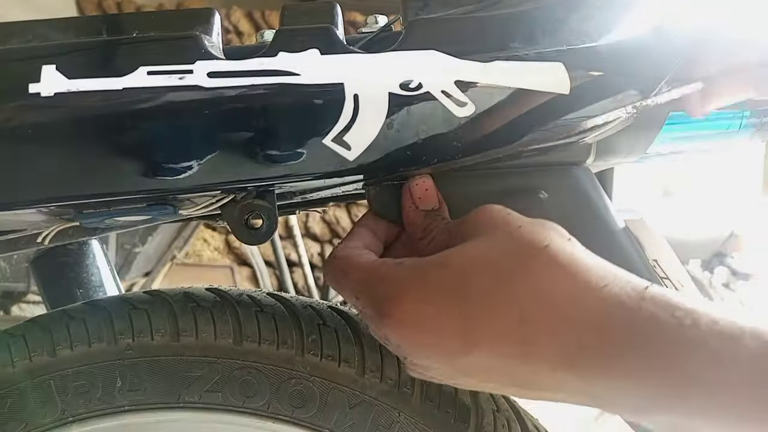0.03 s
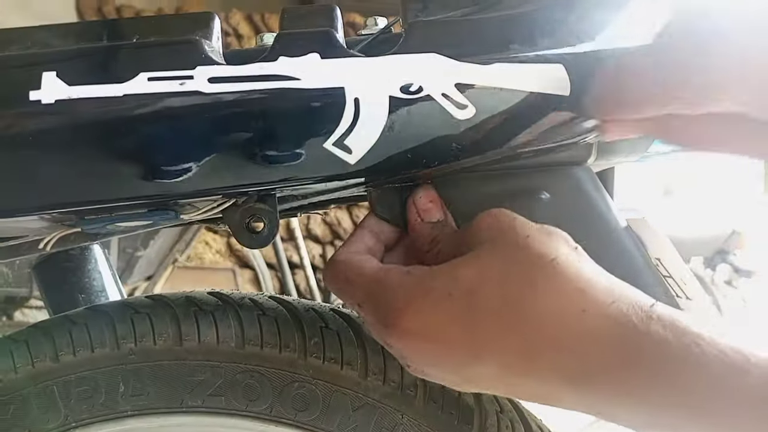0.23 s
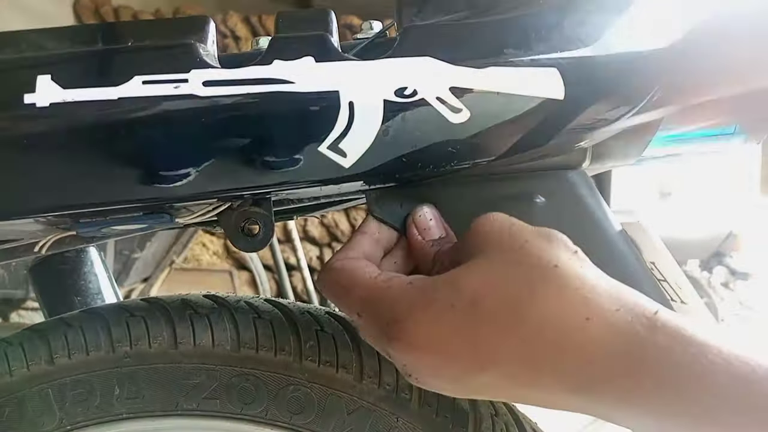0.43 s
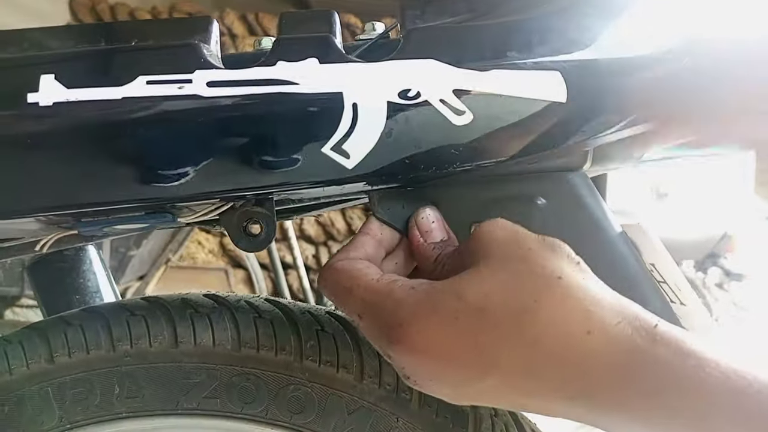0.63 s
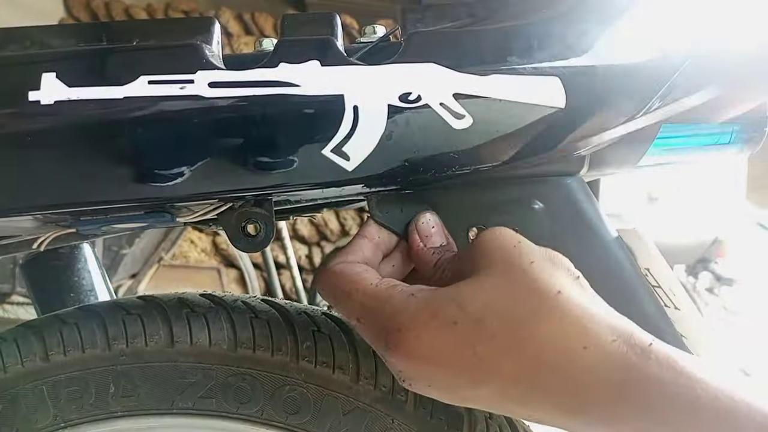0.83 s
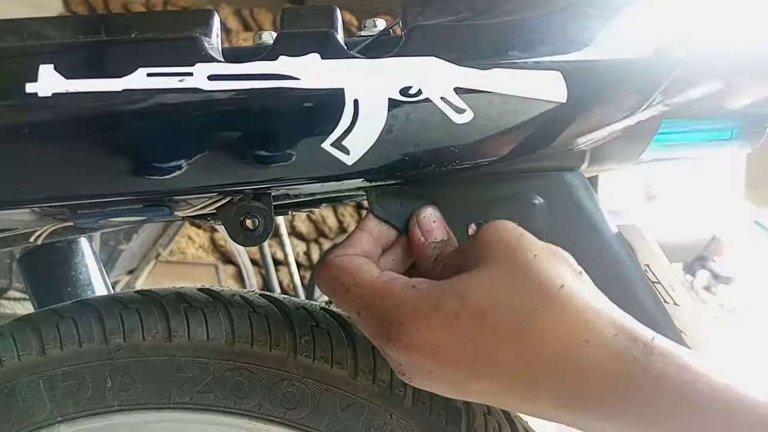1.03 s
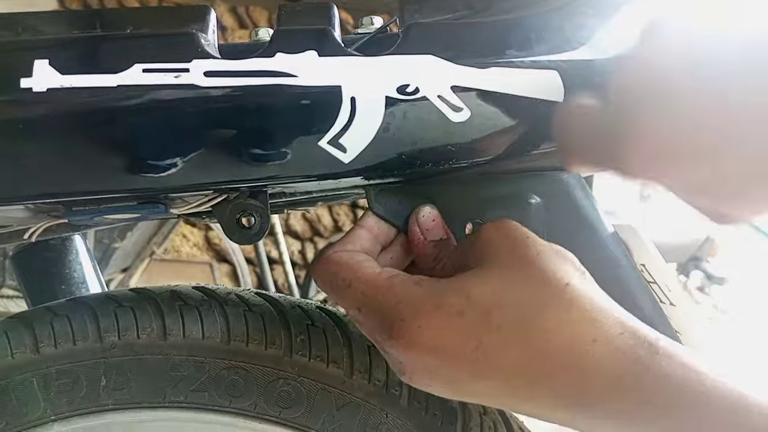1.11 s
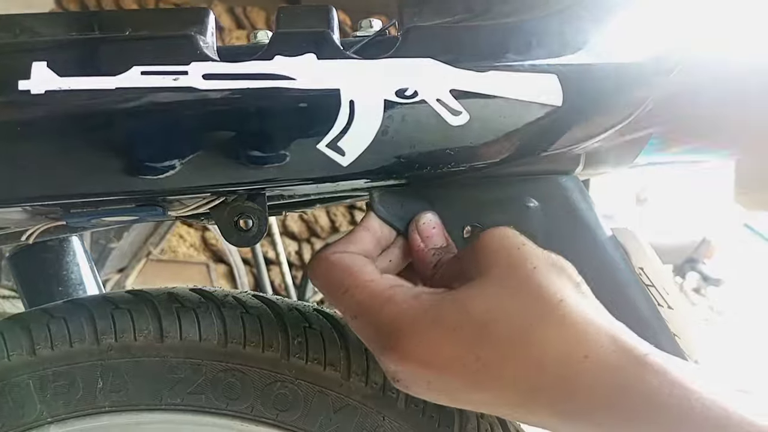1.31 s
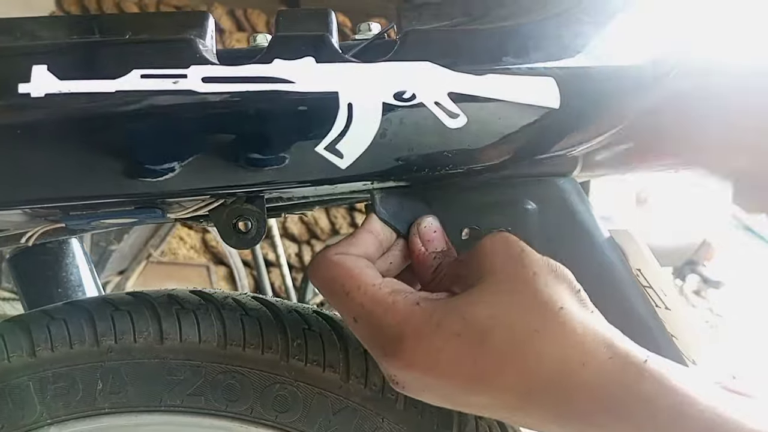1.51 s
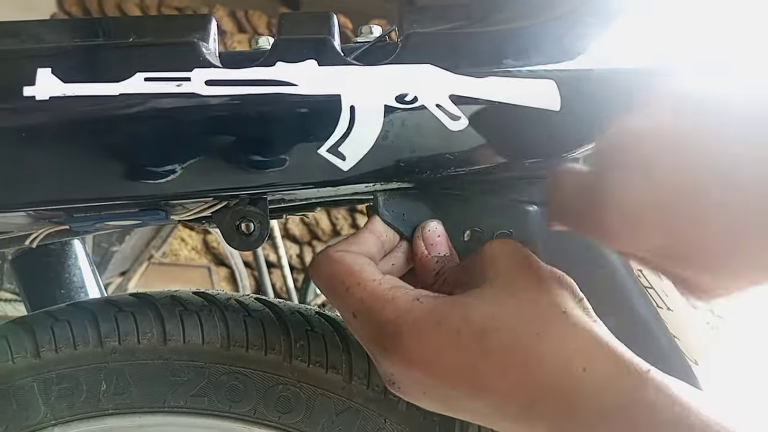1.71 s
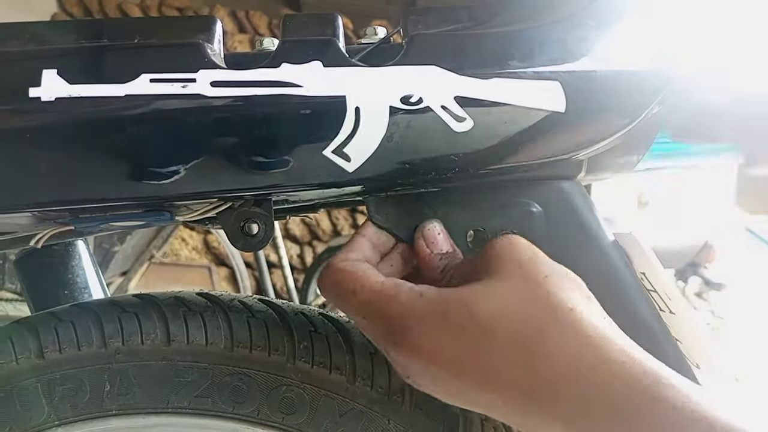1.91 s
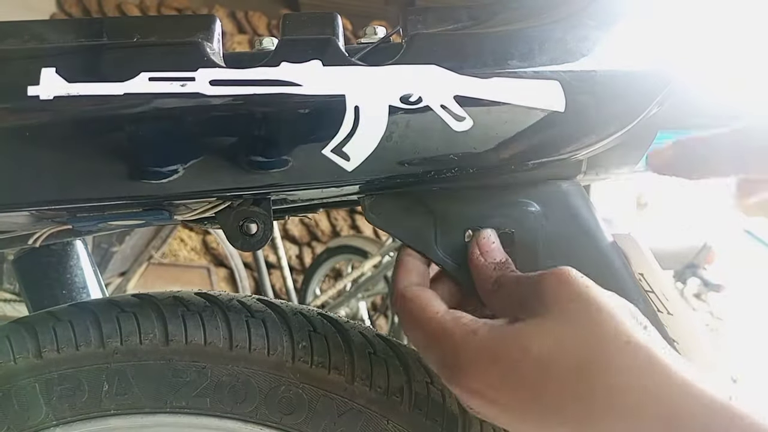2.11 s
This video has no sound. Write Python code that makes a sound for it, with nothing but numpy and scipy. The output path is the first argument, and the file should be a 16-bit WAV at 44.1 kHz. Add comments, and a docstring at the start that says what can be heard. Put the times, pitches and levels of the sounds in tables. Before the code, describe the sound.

Fast hacksaw strokes rasp through a hand-held plastic mudguard, with groans and one sharp snap.

```python
"""A faint rising squeak over a quiet yard, then a light, bright scrape as a hacksaw blade slides in.
Close by, it cuts a hand-held plastic mudguard in about twelve strokes a second: each pass speeds up
and slows as the teeth pluck the panel, tear off chips and hiss in the slot. Coarse bites, groaning
judders and edge knocks colour the strokes; one sharp snap breaks out, and a last light slide draws
the blade out. Shaped noise, tooth pulses and resonant modes make the sound, alike in both ears."""
import sys
import numpy as np
from scipy import signal
from scipy.fft import rfft, irfft, next_fast_len
from scipy.io import wavfile
from scipy.ndimage import map_coordinates

SR = 44100
rng = np.random.default_rng(int(sys.argv[2]) if len(sys.argv) > 2 else 0)


def put_to_file(sound):
    """Save the sound as 16-bit audio at rate SR, in the file named by the first command-line argument."""
    columns = np.atleast_2d(sound).T  # one column per channel
    safe = np.clip(columns, -1, 1)
    whole_steps = np.round(safe * 32767)
    wavfile.write(sys.argv[1], SR, whole_steps.astype(np.int16))


N = 94815  # samples


def amp(db):
    """Decibels to gain."""
    return 10 ** (np.asarray(db) / 20)


def unit(x):
    """Scale to rms 1."""
    return x / np.sqrt(np.mean(x ** 2) + 1e-20)


def filtered(x, response):
    """Multiply the spectrum of x by a complex response of frequency."""
    size = next_fast_len(N + SR // 2)
    spectrum = rfft(x, size) * response(np.fft.rfftfreq(size, 1 / SR))
    return irfft(spectrum, size)[:N]


def colour(x, points, size=4096):
    """Minimum-phase filter of energy 1, shaped by (frequency [Hz], level [dB]) points."""
    hz, db = np.transpose(points)
    log_grid = np.log(np.fft.rfftfreq(size, 1 / SR) + 1)
    cepstrum = irfft(np.log(amp(np.interp(log_grid, np.log(hz), db))))
    # folding the cepstrum onto positive time makes the filter causal
    cepstrum[1:size // 2] *= 2
    cepstrum[size // 2 + 1:] = 0
    impulse = irfft(np.exp(rfft(cepstrum)))
    return signal.fftconvolve(x, impulse / np.linalg.norm(impulse))[:N]


def noise():
    """White noise with an expected rms of 1."""
    return rng.standard_normal(N)


def wobble(rate):
    """A smooth random curve with rate knots a second."""
    return map_coordinates(rng.standard_normal(N), [np.arange(N) * rate / SR])


def since(start):
    """Seconds since start, zero before it."""
    return np.maximum(np.arange(N) / SR - start, 0)


def arch(start, length, peak=0.57):
    """One pass from rest to 1 and back, fastest at peak as a share of its length."""
    phase = np.interp(since(start), [0, length * peak, length], [0, .5, 1])
    return np.sin(np.pi * phase).clip(0)


def burst(start, t60):
    """A sudden start and an exponential fall of 60 dB in t60 seconds."""
    t = since(start)
    return (t > 0) * amp(-60 * t / t60)


def ringing(x, modes):
    """Ring x through a body's resonant modes, with overall filter energy 1."""
    def response(f):
        """Sum of band-pass resonances with alternating signs."""
        h = 0
        for k, (centre, width, db) in enumerate(modes):
            damping = 1j * f * width
            h = h + (-1) ** k * amp(db) * damping / (centre * centre - f * f + damping)
        return h / np.sqrt(np.mean(np.abs(h) ** 2))
    return filtered(x, response)


def teeth(rate, jitter, scatter_db):
    """One pulse for each tooth that catches, a little uneven in time and size."""
    turns = np.cumsum(rate) / SR
    chance = rng.standard_normal((N // 20, 2))[:int(turns[-1])]
    late = jitter * chance[:, 0]  # as a share of a tooth period
    at = np.interp(np.arange(len(chance)) + late, turns, np.arange(N))
    return np.bincount(at.astype(int), amp(scatter_db * chance[:, 1]), N)


# Spectrum of the yard hum: (frequency [Hz], relative level [dB per Hz])
YARD_SPECTRUM = [(25, -54), (60, -4.5), (120, 3), (220, 0.5), (450, -5), (1200, -13), (2400, -7.5),
                 (3500, -24), (4700, -15), (7000, -23.5), (9000, -38), (16000, -46)]
YARD_DB = -58.5


def yard():
    """A steady low hum of the yard, made from shaped noise."""
    return amp(YARD_DB) * colour(noise(), YARD_SPECTRUM)


ROOM_T60, ROOM_DB = 0.45, -15.5  # decay [s], gain of the reflections [dB]


def room(work):
    """Nearby walls answer faintly: the work smeared through a decaying noise tail."""
    tail = burst(0.0016, ROOM_T60) * noise()
    return amp(ROOM_DB) * signal.fftconvolve(work, tail / np.linalg.norm(tail))[:N]


SQUEAK_S, SQUEAK_LENGTH_S = 0.0036, 0.068
SQUEAK_HZ, SQUEAK_RISE_HZ, SQUEAK_DB = 12000, 746, -75


def squeak(waver_hz=50):
    """A faint, thin rising squeak before the blade sets in: a sine with a wavering pitch."""
    # the pitch arch is twice as long as the squeak, so only its rising part is heard
    rise = SQUEAK_RISE_HZ * arch(SQUEAK_S, 2 * SQUEAK_LENGTH_S)
    hz = SQUEAK_HZ + rise + waver_hz * wobble(600)
    swell = arch(SQUEAK_S, SQUEAK_LENGTH_S) ** 2
    return amp(SQUEAK_DB) * swell * np.sin(2 * np.pi * np.cumsum(hz) / SR)


# Light slides of the blade: (start [s], length [s], rise [s], level before flutter [dB])
SLIDE_PASSES = [(0.073, .1, 0.074, -48), (0.147, 0.02, 0.0037, -45), (0.181, 0.16, 0.0032, -45),
                (2.023, 0.086, 0.0087, -61)]
# Spectrum of the scrape: (frequency [Hz], relative level [dB per Hz])
SLIDE_SPECTRUM = [(300, -30.5), (1200, -7.5), (2400, 2.5), (3500, -4.5), (5000, -3.5), (5800, 3), (6800, 9),
                  (7600, 1), (8700, -13.5), (11000, -22), (13700, -21), (14700, -17), (16000, -10)]


def slides(release_s=0.029, flutter_db=3.76):
    """The blade skims the slot without biting: a thin, bright scrape of fluttering noise."""
    level = 0
    for start, length, rise, db in SLIDE_PASSES:
        fade_in = np.minimum(since(start) / rise, 1)
        fade_out = np.clip((length - since(start)) / release_s, 0, 1)
        level = level + amp(db) * fade_in * fade_out
    return colour(level * amp(flutter_db * wobble(150)) * noise(), SLIDE_SPECTRUM)


# Teeth knocking on the edge: (time [s], level before the tone mix [dB])
EDGE_KNOCKS = [(.184, -39.5), (0.206, -28.5), (.218, -28), (1.222, -28), (1.392, -44), (1.607, -25)]


def knocks(t60=0.022, kick=4, kick_t60=0.00015):
    """A tooth bumps the edge: a kick and a short, hollow crack."""
    push, crack = 0, 0
    for start, db in EDGE_KNOCKS:
        impulse = burst(start, kick_t60)
        push = push + amp(db) * impulse / np.linalg.norm(impulse)
        crack = crack + amp(db) * burst(start, t60)
    blows = crack * noise() + kick * push
    return 0.56 * colour(blows, BITE_SPECTRUM) + 0.2 * colour(blows, RASP_SPECTRUM)


# Runs of teeth in step with the panel:
# (start [s], length [s], first pitch before wander [Hz], last pitch before wander [Hz], level [dB])
JUDDER_RUNS = [(.355, 0.033, 690, 645, -36), (.405, 0.032, 820, 842, -36.5), (.488, 0.05, 340, 508, -37),
               (.52, 0.047, 595, 585, -30.5), (.685, 0.051, 385, 458, -36.5), (.585, 0.046, 640, 793, -37),
               (.715, 0.045, 675, 653, -38.5), (.775, 0.069, 410, 451, -41),
               (.868, 0.0407, 340, 492, -39.5), (.895, 0.051, 660, 683, -39), (1.06, 0.043, 690, 637, -33),
               (1.285, 0.038, 790, 810, -37.5), (1.575, 0.026, 500, 525, -39.5),
               (1.679, 0.076, 835, 813, -41.5), (1.825, 0.036, 380, 351.3, -41)]
JUDDER_JITTER, JUDDER_SCATTER_DB = 0.035, 0.5  # share of a tooth period, spread of pluck size


def judders(wander=0.0256):
    """Short runs of evenly spaced plucks give the panel a gliding, pitched groan."""
    out = np.zeros(N)
    panel_pulse = ringing(np.eye(1, N)[0], PANEL_MODES)[:SR // 10]
    for start, length, first_hz, last_hz, db in JUDDER_RUNS:
        swell = arch(start, length)
        glide = np.interp(since(start), [0, length], [first_hz, last_hz])
        rate = glide * np.exp(wander * wobble(120))
        plucks = teeth(rate, JUDDER_JITTER, JUDDER_SCATTER_DB)
        groan = signal.fftconvolve(swell * plucks, panel_pulse)[:N]
        # give the groan the same energy as its swell
        out += amp(db) * groan * np.linalg.norm(swell) / np.linalg.norm(groan)
    return out


# Moments when the teeth dig in hard: (start [s], length [s], level [dB])
DEEP_BITES = [(0.319, 0.015, -34), (0.51, 0.036, -26), (0.873, 0.014, -42), (.959, 0.015, -38),
              (1.146, 0.02, -29.5), (1.286, 0.023, -34.5), (1.425, 0.027, -35.5), (1.58, 0.011, -36),
              (1.944, 0.012, -43.5)]
# Spectrum of a coarse bite: (frequency [Hz], relative level [dB per Hz])
BITE_SPECTRUM = [(40, -58), (150, -31), (350, -9), (600, -1), (850, 0), (1300, 0), (1950, -0.5),
                 (2500, -0.5), (3000, -15.5), (5000, -29.5), (7000, -19), (8500, -47), (16000, -55)]


def bites(jitter=.07, scatter_db=3, tearing=0.65):
    """Deep cuts: each tooth snaps through the plastic in a coarse, hollow rasp."""
    force = sum(amp(db) * np.sqrt(arch(start, length)) for start, length, db in DEEP_BITES)
    rate = TOOTH_HZ * np.exp(0.13 * wobble(40))
    plucks = unit(teeth(rate, jitter, scatter_db))
    return colour(force * unit(plucks + tearing * noise()), BITE_SPECTRUM)


# Spectrum of the snap: (frequency [Hz], relative level [dB per Hz])
SNAP_SPECTRUM = [(40, -63), (200, -51), (700, -20), (1150, -3.5), (1750, -7), (2250, 0.5), (2700, -0.5),
                 (3100, -10.5), (5000, -11), (5600, -3.5), (6200, -2.5), (6700, -12.5), (7250, -7.5),
                 (8000, -22.5), (11000, -33.5), (14000, -38), (15200, -26)]
SNAP_S, SNAP_DB, SNAP_T60 = 1.6264, -17.5, 0.01  # start [s], gain [dB], decay [s]
SNAP_TAIL_DB, SNAP_TAIL_T60 = -27, .05  # rattle against the crack [dB], decay [s]


def snap(kick=7, kick_t60=0.00034, hold_s=0.0038):
    """The blade snags and breaks free: one hard kick, brief splintering and a short rattle."""
    splinter = (since(SNAP_S) > 0) * amp(-60 * since(SNAP_S + hold_s) / SNAP_T60)
    rattle = amp(SNAP_TAIL_DB) * burst(SNAP_S, SNAP_TAIL_T60)
    crack = (splinter + rattle) * noise()
    push = burst(SNAP_S, kick_t60)
    return amp(SNAP_DB) * colour(crack + kick * push / np.linalg.norm(push), SNAP_SPECTRUM)


# Spectrum of the low thud: (frequency [Hz], relative level [dB per Hz])
THUD_SPECTRUM = [(30, -37), (50, -24), (80, -11.5), (130, 0), (250, -1), (400, 1.5), (900, -21),
                 (3000, -101)]


def stroke_thud(level):
    """The push of each stroke: low noise that follows the blade."""
    return colour(level * noise(), THUD_SPECTRUM)


# Spectrum of the hiss: (frequency [Hz], relative level [dB per Hz])
HISS_SPECTRUM = [(800, -21.5), (2400, 8), (3400, -4.5), (5100, -5), (5800, -2.5), (6400, -0.5),
                 (7150, -3.5), (7700, -15.5), (8700, -27.5), (10500, -33), (13700, -41), (14900, -20),
                 (16000, -35)]
SLOT_DB = 1


def slot_hiss(level, grain):
    """The blade hisses in the slot: bright noise, partly grained by the tearing teeth."""
    rubbing = unit((1.8 + grain) * noise())
    return amp(SLOT_DB) * colour(level * rubbing, HISS_SPECTRUM)


# Modes of the plastic mudguard: (frequency [Hz], width [Hz], relative level [dB])
PANEL_MODES = [(349.7, 25.4, 1), (431.4, 32.4, -2), (493, 20, 2), (582.8, 34, 0), (672, 14, -3),
               (690.6, 25.5, -5.5), (831, 54.2, 2), (1153, 85, -3.5), (1310, 59, -9.5), (1600, 61, -4.5),
               (1896, 43, -10), (2207, 46.5, -3.5), (2352, 23.3, -10.5)]
RING_DB = -.5


def panel_ring(level, plucks, panel_noise=0.67):
    """Tooth plucks and rubbing noise set the mudguard's modes ringing."""
    drive = unit(unit(plucks) + panel_noise * noise())
    return amp(RING_DB) * ringing(level * drive, PANEL_MODES)


# Light grazes of the teeth on the edge: (start [s], length [s], level before the chip mix [dB])
EDGE_GRAZES = [(.085, 0.043, -56), (0.201, 0.052, -45.5), (0.231, 0.055, -37.5), (1.936, 0.018, -42.5),
               (2.018, 0.082, -50)]
# Spectrum of the rasp: (frequency [Hz], relative level [dB per Hz])
RASP_SPECTRUM = [(40, -60), (200, -20), (500, -1.5), (900, 1), (1400, -3), (1780, -2), (2050, 4.5),
                 (2450, 5), (2800, 4.5), (3200, -4.5), (4000, -15), (5000, -21.5), (7000, -22), (8500, -41),
                 (16000, -58)]
# Modes of the steel blade: (frequency [Hz], width [Hz], relative level [dB])
BLADE_MODES = [(2019, 55, 3), (2155, 52, 4), (2326, 57, 4), (2498, 64, -1.5), (2576, 60, -6),
               (2690, 65, -3), (2810, 18, -8.5), (3680, 32, -7.5), (6100, 55, -15)]
CHIP_DB, BLADE_DB = -2.5, -7.5


def chip_rasp(level, grain, plucks, tooth_share=0.75):
    """Tearing chips and light grazes rasp as grained noise and ring the steel blade."""
    grazes = sum(amp(db) * np.sqrt(arch(start, length)) for start, length, db in EDGE_GRAZES)
    tearing = level * unit(grain * noise() + tooth_share * unit(plucks))
    cutting = tearing + grazes * noise()
    rasp = amp(CHIP_DB) * colour(cutting, RASP_SPECTRUM)
    return rasp + amp(BLADE_DB) * ringing(cutting, BLADE_MODES)


# Saw strokes: (start [s], length [s], fastest point [share of length],
# then levels before grip and layer gains: thud [dB], panel [dB], rasp [dB], hiss [dB])
STROKE_PASSES = [(0.298, 0.097, 0.35, -46, -34.5, -32, -40), (0.398, 0.095, 0.38, -55.5, -35.5, -34.5, -40),
                 (0.485, 0.081, 0.52, -74, -26.5, -34, -39.5), (0.574, 0.098, 0.36, -70, -35, -35, -39),
                 (0.675, 0.088, 0.4, -80, -36, -37, -42.5), (0.758, 0.095, 0.39, -78, -38.5, -33, -40),
                 (0.854, 0.092, 0.53, -68, -36, -33.5, -40),
                 (0.948, 0.091, 0.42, -50.5, -34.5, -30.5, -38.5),
                 (1.039, 0.079, 0.42, -49, -32.5, -32, -41), (1.12, 0.085, 0.41, -48, -36, -29, -36),
                 (1.209, 0.066, 0.49, -45, -38, -35, -42.5), (1.269, 0.08, 0.36, -45.5, -34, -32.5, -38.5),
                 (1.352, 0.065, 0.55, -49.5, -41, -32.5, -41),
                 (1.415, 0.073, 0.37, -41.5, -35.5, -30, -37.5),
                 (1.488, 0.076, 0.51, -51.5, -39.5, -36.5, -42),
                 (1.557, 0.11, 0.42, -48.5, -39.5, -31, -38.5),
                 (1.661, 0.064, 0.41, -49.5, -33, -36, -43.5), (1.723, 0.078, 0.41, -49, -39.5, -33, -39.5),
                 (1.805, 0.097, 0.53, -56, -45, -47.5, -54.5)]
TOOTH_HZ = 735.8  # nominal tooth rate at full speed, before pace scatter
TOOTH_JITTER, TOOTH_SCATTER_DB = 0.079, 5  # share of a tooth period, spread of pluck size
PACE_SCATTER = .1  # log spread of tooth rate from stroke to stroke
CHIP_S, CHIP_SCATTER_DB = .0007, -0.5  # decay constant of one tear [s], variation in its size
RASP_STEADY = 0.6  # steady part added to the tears
LAYER_POWERS = (0.81, 1.73, 1.82, 1.65)  # blade-speed exponents of thud, panel, rasp and hiss
TURN_SPEED = 0.1  # rubbing left as the blade turns round


def sawing(grip_db=0.6):
    """Blade speed sets the tooth rate and the strength of thud, panel ring, rasp and hiss."""
    speeds = np.array([arch(*row[:3]) for row in STROKE_PASSES])
    inside = np.array([(since(start) > 0) & (since(start) < length)
                       for start, length, *_ in STROKE_PASSES])
    rub = TURN_SPEED * inside + (1 - TURN_SPEED) * speeds
    gains = amp(np.array(STROKE_PASSES)[:, 3:]).T
    thud, panel, rasp, hiss = [g @ np.abs(rub) ** power for g, power in zip(gains, LAYER_POWERS)]

    pace = np.exp(PACE_SCATTER * rng.standard_normal(len(STROKE_PASSES)))
    rate = TOOTH_HZ * np.maximum((pace[:, None] * speeds).max(0), .3)
    # dividing by the root of the rate evens out the pulse power
    plucks = teeth(rate, TOOTH_JITTER, TOOTH_SCATTER_DB) / np.sqrt(rate)

    chips = plucks * amp(CHIP_SCATTER_DB * wobble(500))
    tears = signal.lfilter([1], [1, -np.exp(-1 / (CHIP_S * SR))], chips)
    grain = unit(RASP_STEADY + unit(tears))
    grip = unit(amp(grip_db * wobble(110)))

    ring = panel_ring(grip * panel, plucks)
    cut = chip_rasp(grip * rasp, grain, plucks)
    return ring + cut + slot_hiss(hiss, grain) + stroke_thud(thud)


def scene():
    """The saw at work, a faint answer from nearby walls and the yard hum, alike in both ears."""
    work = sawing() + bites() + judders() + slides() + knocks() + squeak() + snap()
    mono = work + room(work) + yard()
    return np.array([mono, mono])


TOP_HZ = 15950


def record(dry):
    """A steep low-pass lets nothing through at or above the band limit."""
    return np.array([filtered(x, lambda hz: hz < TOP_HZ) for x in dry])


dry = scene()
out = record(dry)
put_to_file(out)
```